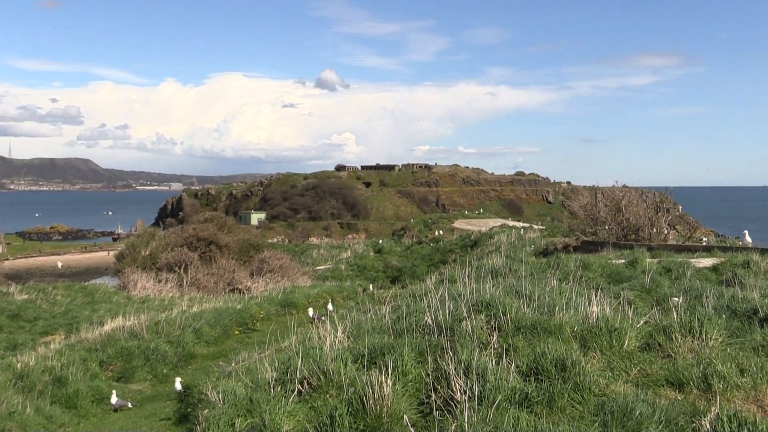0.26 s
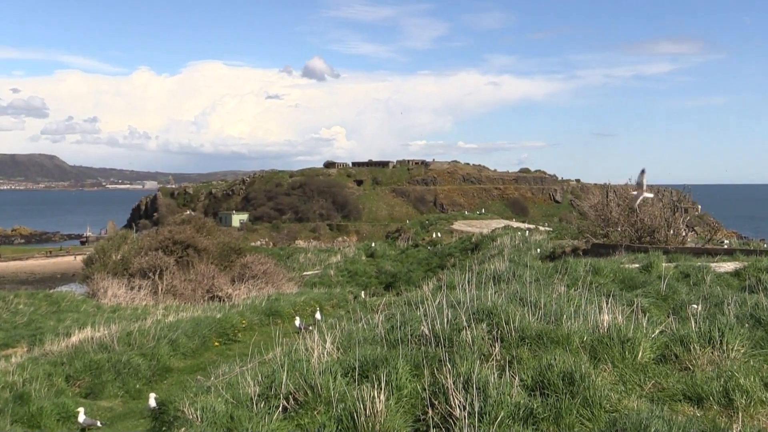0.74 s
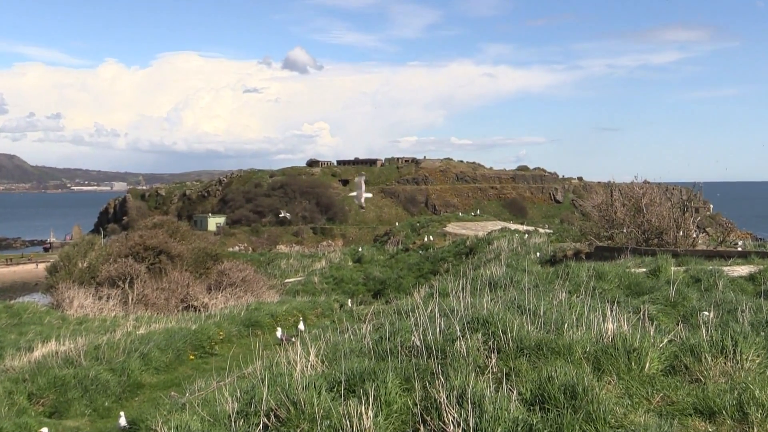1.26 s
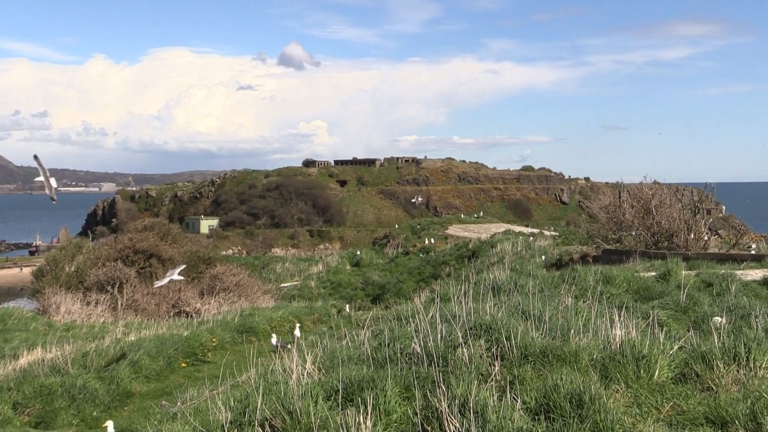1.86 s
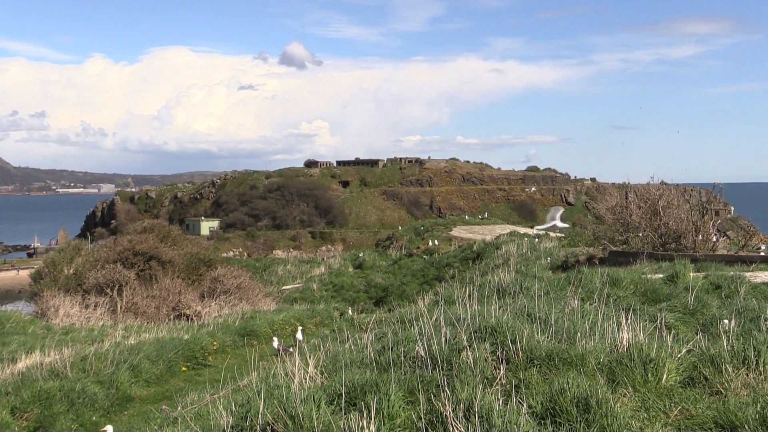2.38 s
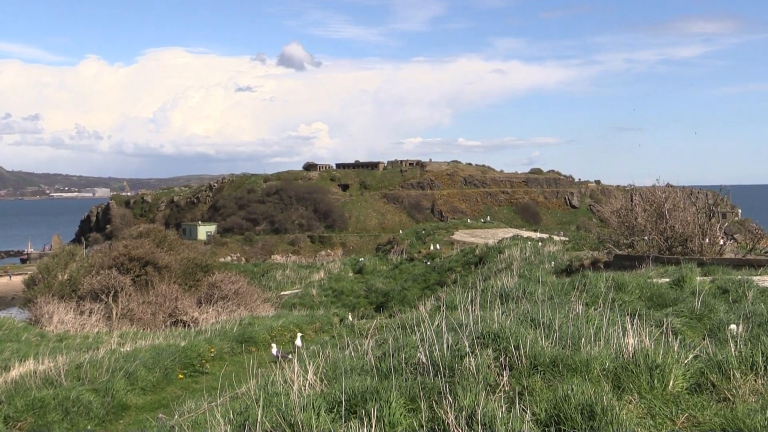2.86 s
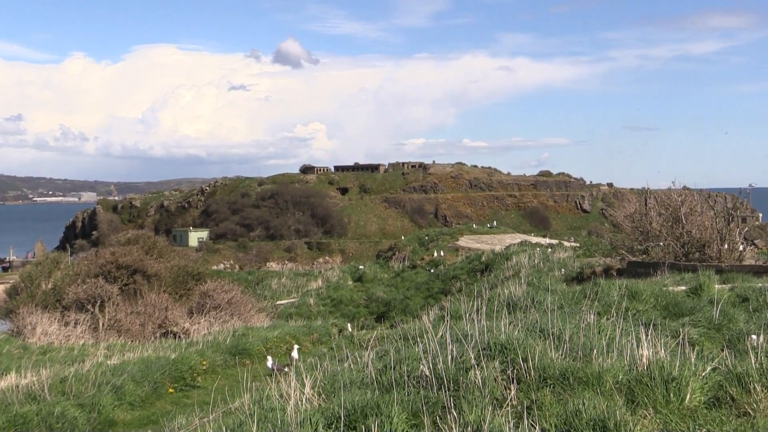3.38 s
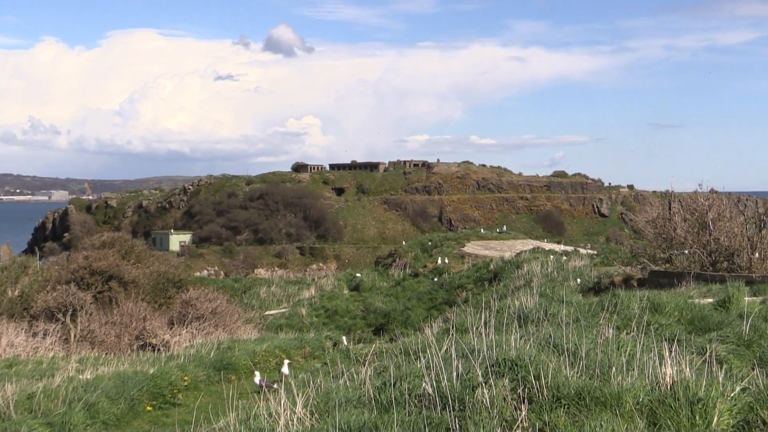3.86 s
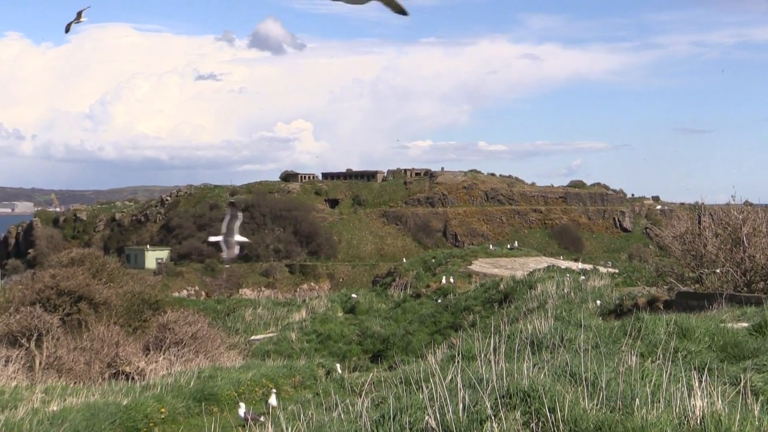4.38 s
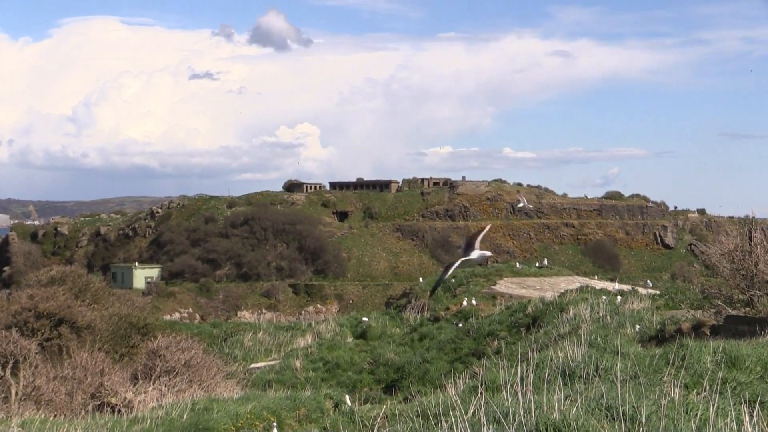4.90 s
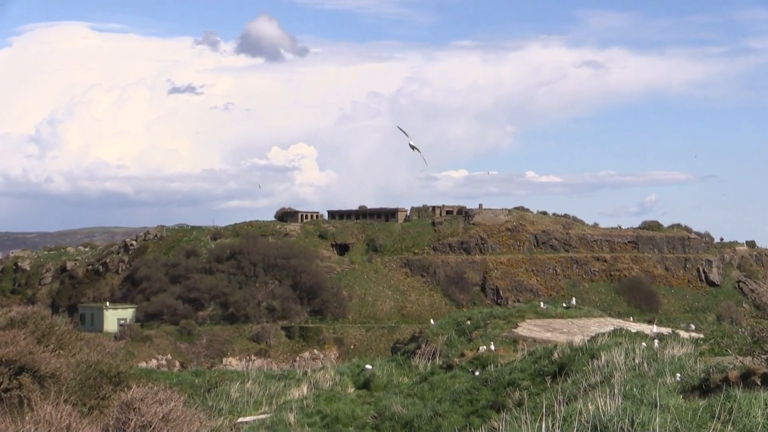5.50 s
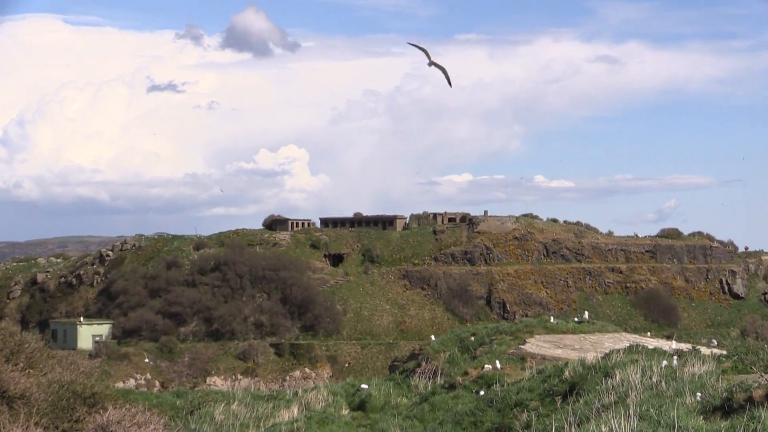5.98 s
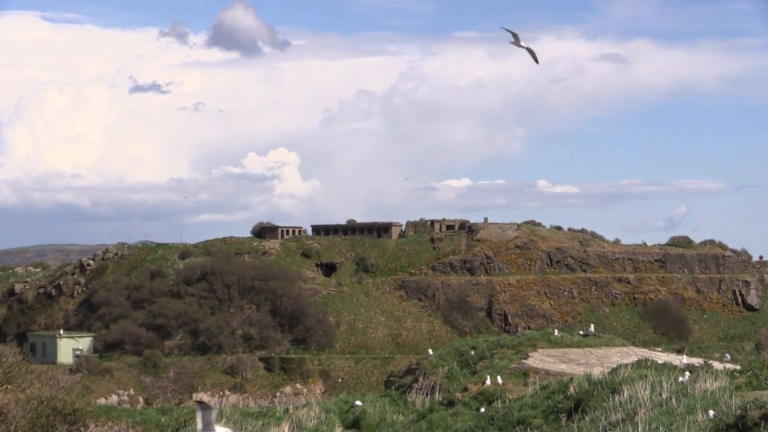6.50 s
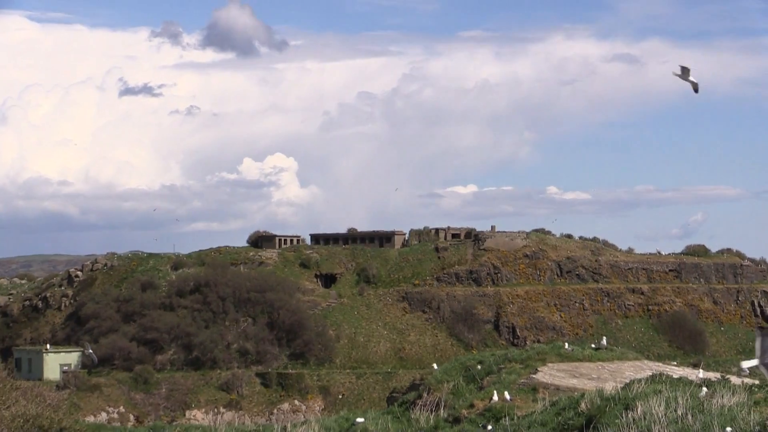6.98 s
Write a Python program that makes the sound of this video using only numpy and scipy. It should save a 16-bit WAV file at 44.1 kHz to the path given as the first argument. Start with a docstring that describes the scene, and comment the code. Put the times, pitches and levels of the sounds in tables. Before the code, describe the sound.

Outdoors on a grassy seaside slope, strong low gusts buffet the microphone over a faint mew. Within a second gulls start up close by: rapid high falling yelps, hoarse laughs breaking upward and soft mews, overlapping densely. Dull mews from far birds fill in behind with thin scattered echoes. Wind keeps rumbling in bursts and eases near the end, over a faint steady sea wash.

```python
"""A gust buffets the microphone over a faint mew, then a gull colony calls on a grassy island slope.
Close to the microphone, gulls trade high falling yelps, hoarse laughs that break upward and soft mews.
Each call is a stack of harmonics shaped by a throat spectrum; roughness makes it uneven and hissing.
Far birds are dull mews across the slope, and the slope's echoes are decaying sparse noise.
Behind them, shaped noise makes the sea wash and the wind rumble, which follows the gusts."""
import sys
import numpy as np
from scipy import signal
from scipy.fft import rfft, irfft
from scipy.io import wavfile
from scipy.ndimage import uniform_filter1d, map_coordinates

SR = 44100
rng = np.random.default_rng(int(sys.argv[2]) if len(sys.argv) > 2 else 0)


def to_wav(sig):
    """Store sig (one row per channel, or 1-D mono) as 16-bit WAV at the path in sys.argv[1].

    Samples outside -1..1 are clipped; the rate is SR.
    """
    pcm = np.clip(np.atleast_2d(sig), -1, 1) * 32767
    pcm = np.round(pcm).astype(np.int16)
    wavfile.write(sys.argv[1], SR, pcm.T)  # frames by channels


N = 319725  # samples


def undb(db):
    """Decibels to gain."""
    return 10 ** (np.asarray(db) / 20)


def unit(x):
    """Scale to rms 1."""
    return x / np.sqrt(np.mean(x ** 2) + 1e-18)


def filtered(x, order, hz, kind="low"):
    """Butterworth filter run forward in time."""
    return signal.sosfilt(signal.butter(order, hz, kind, fs=SR, output="sos"), x)


def colour(hz, points):
    """Gain of a (frequency [Hz], level [dB]) spectrum at the given frequencies."""
    point_hz, point_db = np.transpose(points)
    return undb(np.interp(np.log(hz + 1), np.log(point_hz), point_db))


def noise(points):
    """Noise with a given spectrum, at rms 1."""
    bins_hz = np.arange(N // 2 + 1) * SR / N
    spectrum = rfft(rng.standard_normal(N)) * colour(bins_hz, points)
    return unit(irfft(spectrum, N))


def wobble(size, hz):
    """Smooth random motion of spread about 1, mostly slower than hz."""
    knots = np.arange(size) * hz * 2 / SR
    values = rng.standard_normal(int(knots[-1]) + 4)
    return map_coordinates(values, [knots + 1], order=3, mode="nearest")


def add(track, start, sound):
    """Mix a sound in at its time in seconds."""
    i = int(start * SR)
    a, b = max(i, 0), min(i + len(sound), N)
    if b > a:
        track[a:b] += sound[a - i:b - i]


def drift(when, notes, first, last):
    """A quality that moves evenly from a voice's first note to its last."""
    return np.interp(when, [notes[0][0], notes[-1][0]], [first, last])


def arch(length, first, middle, last):
    """A pitch arch through three points, and the note's progress from 0 to 1."""
    progress = np.linspace(0, 1, int(length * SR))
    curve = np.polyfit([0, .5, 1], [first, middle, last], 2)
    return np.polyval(curve, progress), progress


def swell(progress, attack, release):
    """Smooth onset and end, as shares of the note."""
    onset = np.sin(np.pi / 2 * np.clip(progress / attack, 0, 1))
    end = np.sin(np.pi / 2 * np.clip((1 - progress) / release, 0, 1))
    return onset * end


def resonance(x, hz, width_hz):
    """One resonance, gain 1 at its centre."""
    return signal.lfilter(*signal.iirpeak(hz, hz / width_hz, SR), x)


def syrinx(hz, rough, throat, bright_db=0, jitter=0.06, doubling=0.85, hiss_db=-24):
    """Harmonics through the throat; driven hard, cycles go uneven, the period doubles and the tone rasps."""
    n = len(hz)
    waver, rasp, rattle = .007, .7, 1.1
    uneven_hz = hz * (1 + waver * wobble(n, 68.53) + jitter * rough * wobble(n, 295.9))
    phase = 2 * np.pi * np.cumsum(uneven_hz) / SR
    voice = np.zeros(n)
    # half-numbered partials belong to the doubled period
    for k in np.arange(2, int(2 * throat[-1][0] / hz.mean()) + 1) / 2:
        size = 1 if k % 1 == 0 else doubling * rough * (1 + wobble(n, 60))
        angle = k * phase + rng.uniform(-1.14, 1) * np.pi / 2  # the throat delays each partial differently
        partial = size * np.sin(angle) + rasp * rough * wobble(n, 216.9) * np.cos(angle)
        # effort lifts the treble; each overtone swells and fades as the beak and head move
        treble = np.interp(k * hz, [1300, 3400, 5200], [0, 1, .3])
        overtone_db = (bright_db + 3.2 * wobble(n, 14)) * treble
        voice += partial * colour(k * hz, throat) * undb(overtone_db)
    hiss = filtered(rng.standard_normal(n), 2, [4620, 6840], "band")
    breathy = unit(voice) + undb(hiss_db) * rough * unit(hiss)
    # the membranes slap unevenly, chopping all harmonics at once
    slap = 1 + rattle * rough * np.tanh(wobble(n, 480))
    return unit(breathy * slap)


# Near yelps, by voice: (middle of note [s], level before its swell [dB])
YELP_RUNS = { "opening": [(.36, -32), (.505, -27.5), (.921, -23.5), (1.149, -26)], "steep": [(1.055, -16),
             (1.274, -17), (1.492, -17)], "flat": [(1.367, -20.5), (1.588, -21.5), (1.805, -21),
             (2.035, -21), (2.264, -19), (2.5, -19.5)], "high": [(2.479, -23), (4.935, -19.5),
             (5.195, -16.5), (5.448, -17)], "clear": [(2.732, -17), (2.991, -17), (3.247, -18),
             (3.508, -17), (3.772, -16.5), (4.02, -18), (4.292, -18), (4.552, -19), (4.802, -19),
             (5.052, -19.5), (5.304, -18.5), (5.565, -18.5), (5.816, -18.5)], "harsh": [(4.199, -17.5),
             (4.462, -19.5), (4.727, -19.5), (4.985, -19), (5.238, -18.5), (5.495, -17.5)],
             "long": [(5.74, -19), (6.046, -20), (6.331, -19), (6.606, -21), (6.89, -23), (7.1, -27.5)],
             "fading": [(6.668, -26), (7.188, -25.5)]}
# How each yelping voice drifts from its first note to its last, before the shaping inside each note:
# (first pitch [Hz], last pitch [Hz], fall within a note [0-1], first length [s], last length [s],
#  first roughness [0-1], last roughness [0-1], first overtone lift [dB], last overtone lift [dB])
YELPERS = { "opening": (1222, 1205, 0.065, .085, .082, 0.071, 0.16, 13.5, 3.1),
           "steep": (1380, 1290, 0.24, .046, .05, 0.32, .14, 9.6, 1.2),
           "flat": (1108, 1088, 0.036, .06, .066, .14, 0.44, 4.2, 6),
           "high": (1410.5, 1340.5, .095, 0.28, 0.1149, 0.33, .28, -6, 2),
           "clear": (1290.5, 1329.5, .134, 0.1234, 0.0629, 0.38, 0.16, -3, -3.5),
           "harsh": (1335, 1255, .14, .092, .062, 0.33, .58, 6, 10.4),
           "long": (1324.5, 1309.5, .128, 0.13, 0.19, 0.48, 0.74, -7.5, 7.5),
           "fading": (1279, 1335, .15, 0.02, .094, .2, .25, -14, -17)}
# the last voice in both tables goes by "dull": soft yelps with weak overtones
YELP_RUNS["dull"] = YELP_RUNS.popitem()[1]
YELPERS["dull"] = YELPERS.popitem()[1]


def yelping_gulls(lead_top_hz=3000, lead_s=.08, lead_db=-8, lead_ceiling_db=-27):
    """Runs of near yelps that drift in pitch, length and tone, each led in by a soft rising note an octave below."""
    out = np.zeros(N)
    for name, notes in YELP_RUNS.items():
        hz0, hz1, fall, length0, length1, rough0, rough1, bright0, bright1 = YELPERS[name]
        for when, db in notes:
            hz = drift(when, notes, hz0, hz1)
            length = drift(when, notes, length0, length1)
            rough = drift(when, notes, rough0, rough1)
            bright_db = drift(when, notes, bright0, bright1)
            start, last = when - length / 2, hz * (1 - fall)
            add(out, start, undb(db) * yelp(length, hz, last, rough, bright_db))
            lead = mew(lead_s, 0.36 * last, .47 * last, .51 * last, beak_hz=1515, beak_width_hz=590,
                       beak_db=11.5, overtone_db=-9.5)
            lead = filtered(lead, 2, lead_top_hz)  # the beak is still half shut
            add(out, start - .62 * lead_s, undb(min(db + lead_db, lead_ceiling_db)) * lead)
    return out


# Throat colour of the high register: (frequency [Hz], level [dB])
HIGH_THROAT = [(550, -18), (1050, 0), (1300, -0.5), (1800, -5), (2450, -8), (3450, -6.5), (4100, -21.5),
               (4800, -20.5), (6200, -43), (10000, -63.5)]


def yelp(length, first, last, rough, bright_db, bow=0.02957, opening_db=7):
    """A high note sagging at both ends, brightest as the beak gapes, clearing as the pressure drops."""
    hz, progress = arch(length, first, (1 + bow) * (first + last) / 2, last)
    hz = hz * (1 - .035 * (2 * progress - 1) ** 6)
    gape_db = bright_db + opening_db * (np.sin(np.pi * progress) - .75)
    clearing = np.clip(rough, 0, 1) * (1.25 - .7 * progress)
    return syrinx(hz, clearing, HIGH_THROAT, gape_db) * swell(progress, .28, .28)


# Near laughs, by voice: (crest time [s], level before its contour and swell [dB])
LAUGH_RUNS = { "low": [(1.019, -26), (1.245, -23), (1.48, -25), (1.7, -22.5), (1.919, -19), (2.141, -20.5),
              (2.365, -20.5), (2.604, -18.5), (2.83, -20.5), (3.055, -24), (3.282, -22), (3.521, -21),
              (3.765, -21.5), (3.985, -18.5), (4.251, -21.5), (4.5, -23), (4.755, -29), (5.001, -30)],
              "strained": [(4.399, -18.5), (4.648, -19.5), (4.895, -20.5), (5.149, -19), (5.416, -20.5),
              (5.74, -20.5), (6.025, -22), (6.316, -20.5), (6.595, -20), (6.876, -24.5), (7.121, -22.5)],
              "middle": [(5.319, -23.5), (5.605, -21.5), (6.682, -25.5)], "clean": [(5.868, -23),
              (6.14, -23), (6.403, -24), (6.534, -26), (6.808, -25), (7.23, -27)]}
# Each laughing voice; a negative climb leaves only a scrap of the note after its crest time:
# (first nominal crest pitch [Hz], last nominal crest pitch [Hz], climb [s], level at climb start [dB],
#  hoarseness [factor], beak resonance [Hz], beak level [dB])
LAUGHERS = { "low": (523, 507, .092, -6, 1, 2700, -4), "strained": (612, 594, 0.1264, -6, 1.98, 3499, -8),
            "middle": (585, 562, -0.04, -6.5, 1.6, 3301.5, -12.5),
            "clean": (506, 514, 0.35, -13, 0.65, 3061, -4)}


def laughing_gulls():
    """Runs of near laughing notes; each voice repeats one shape while its pitch drifts."""
    out = np.zeros(N)
    for name, notes in LAUGH_RUNS.items():
        hz0, hz1, climb, climb_db, hoarse, beak_hz, beak_db = LAUGHERS[name]
        for crest, db in notes:
            crest_hz = drift(crest, notes, hz0, hz1)
            note = laugh(climb, crest_hz, climb_db, hoarse, beak_hz, beak_db)
            add(out, crest - climb, undb(db) * note)
    return out


# Throat colour of the low register, also used by the mews: (frequency [Hz], level [dB])
LOW_THROAT = [(480, -24.5), (950, -8), (1450, -2.5), (2150, -4.5), (2750, -5.5), (3200, -2), (3600, -2),
              (4150, -9), (4900, -21), (7500, -43.5)]


def laugh(climb, crest_hz, climb_db, hoarse, beak_hz, beak_db, fall=0.0445, knee=.017, dull_db=-14,
          beak_width_hz=260):
    """A clean climbing note that brightens, breaks upward to a loud, hoarse crest and sags."""
    t = np.arange(-climb, fall, 1 / SR)  # seconds from the crest
    pitch_times = [-climb, -(knee + climb) / 2, -knee, -knee / 2, 0, fall / 2, fall]
    hz = crest_hz * np.interp(t, pitch_times, [.73, .86, .895, 1.0, .995, .98, .82])
    rough = hoarse * np.interp(t, [-1.3 * knee, -knee / 2, 0, fall], [.04, .32, .13, .25])
    bright_db = np.interp(t, [-climb, -knee, fall / 2, fall], [dull_db, 0, 0, dull_db / 2])
    voice = syrinx(uniform_filter1d(hz, size=300), rough, LOW_THROAT, bright_db)
    voice = unit(voice + undb(beak_db) * unit(resonance(voice, beak_hz, beak_width_hz)))
    contour_db = np.interp(t, [-climb, -knee, 0, fall], [climb_db, climb_db / 2, 0, -5])
    return voice * undb(contour_db) * swell((t + climb) / (climb + fall), .25, .17)


# Near drawn-out mews: (start [s], length [s], first pitch [Hz], middle pitch [Hz], last pitch [Hz],
#  level before its swell [dB], beak resonance [Hz], second resonance relative to the note [dB])
SINGLE_MEWS = [(-.03, .19, 490, 500.6, 516, -41.5, 1040, -6.5), (0.141, .24, 708, 727, 709, -39, 1350, -12),
               (0.171, 0.13, 558, 623, 706, -36, 1990, -38), (.592, 0.19, 437, 472, 527, -37.5, 900, -9),
               (0.681, .1, 605, 683, 712, -31.5, 2010, -42), (0.767, 0.13, 614, 686, 698, -26.5, 1980, -43),
               (3.529, .1, 537, 532, 462, -26.5, 1054, -15), (3.632, .11, 468, 527, 513, -30.5, 1344, -15),
               (4.04, .16, 648, 655, 611, -31, 1850, -30)]


def mewing_gulls(upper_ratio=3.27, upper_width_hz=380):
    """Single near mews; in some the beak's second resonance whistles."""
    out = np.zeros(N)
    for start, length, first, middle, last, db, beak_hz, upper_db in SINGLE_MEWS:
        note = mew(length, first, middle, last, beak_hz, beak_db=7, overtone_db=-6)
        upper_hz = upper_ratio * beak_hz
        whistle = resonance(note, upper_hz, upper_width_hz)
        whistle = unit(resonance(whistle, upper_hz, upper_width_hz))
        add(out, start, undb(db) * (note + undb(upper_db) * whistle))
    return out


def mew(length, first, middle, last, beak_hz, beak_width_hz=200, beak_db=6, overtone_db=-5):
    """A soft, clean low note whose harmonics are reinforced by one beak resonance."""
    hz, progress = arch(length, first, middle, last)
    voice = syrinx(hz, .05, LOW_THROAT, bright_db=overtone_db)
    beak = unit(resonance(voice, beak_hz, beak_width_hz))
    return unit(voice + undb(beak_db) * beak) * swell(progress, .18, .15)


def far_gulls(count=80, far_db=-36, calm_db=-13, air_hz=2400):
    """Mews across the slope, spread over the whole scene and growing over the first 4 s; distance dulls them."""
    out = np.zeros(N)
    for i, (when, size, pitch, bend, distance) in enumerate(rng.random((count, 5))):
        start = (i + when) / count * N / SR
        hz = 400 + 280 * pitch
        note = mew(.1 + 0.12 * size, hz * (.8 + .2 * bend), hz, .88 * hz, beak_hz=900 + 700 * bend)
        joining_db = np.interp(start, [.4, 4], [calm_db, 0])
        add(out, start, note * undb(far_db - 2 * distance + joining_db))
    return filtered(out, 1, air_hz)


def slope(x, t60=0.72, top_hz=3000):
    """Open ground returns a thin, dull scatter of echoes."""
    t = np.arange(SR) / SR
    # cubing makes a few echoes stand out; none returns within 6 ms
    echoes = rng.standard_normal(SR) ** 3 * undb(-60 * t / t60) * (t > .006)
    echoes = filtered(echoes, 2, top_hz)
    return signal.fftconvolve(x, echoes / np.linalg.norm(echoes))[:N]


# Spectrum of the rumble at the microphone: (frequency [Hz], level [dB])
WIND_SPECTRUM = [(12, -35.5), (20, -5), (54, 1.5), (81, 1.5), (137, -9), (260, -21.5), (379, -34),
                 (650, -44), (840, -72), (1430, -120)]


def wind(eddy_db=2.5, flutter_db=4.0, eddy_hz=130):
    """Gusts set the rumble's level; eddies buffet it and make its upper part flutter."""
    rumble = noise(WIND_SPECTRUM)
    rumble = rumble / np.sqrt(uniform_filter1d(rumble ** 2, size=4000))  # even out its own swells
    upper = signal.sosfiltfilt(signal.butter(2, eddy_hz, "high", fs=SR, output="sos"), rumble)
    buffet = rumble + upper * (undb(flutter_db * wobble(N, 22)) - 1)
    return buffet * gust_strength() * undb(eddy_db * wobble(N, 14))


# Gusts on the microphone: (arrival at full strength [s], hold [s], level before eddies [dB])
GUST_TIMES = [(0.102, 0.087, -10.5), (0.342, .14, -7.5), (0.597, 0.11, -15), (1.995, 0.13, -9),
              (2.202, 0.18, -17), (2.623, 0.06, -10), (2.777, 0.092, -15.5), (3.057, 0.82, -12.5),
              (4.0, 0.25, -13.5), (4.497, 0.42, -14.5), (5.037, 0.24, -15), (5.74, 0.48, -25.5),
              (6.24, 0.054, -16.5), (6.637, 0.028, -19), (6.847, 0.087, -20), (7.015, .23, -28.5)]


def gust_strength(attack_s=0.072, decay_s=0.076, lull_db=-33):
    """Each gust builds quickly, holds and dies away into a light breeze."""
    t = np.arange(N) / SR
    strength = np.full(N, undb(lull_db))
    for arrival, hold, db in GUST_TIMES:
        build = np.clip(1 + (t - arrival) / attack_s, 0, 1)
        die = np.exp(-np.clip(t - arrival - hold, 0, 1) / decay_s)
        strength = np.maximum(strength, undb(db) * build * die)
    return strength


# Spectrum of the sea below the slope: (frequency [Hz], level [dB])
SEA_SPECTRUM = [(30, -14.5), (100, -3.5), (380, 1), (700, -7.5), (2000, -12), (4000, -36), (6500, -38.5),
                (15000, -42.5)]


def sea_wash(sea_db=-39):
    """Broad noise from below the slope, its level wandering slowly."""
    return noise(SEA_SPECTRUM) * undb(sea_db + 0.55 * wobble(N, 1.3))


def scene(echo_db=-17):
    """Near and far gulls, their echoes, wind and sea wash."""
    near = yelping_gulls() + laughing_gulls() + mewing_gulls()
    far = far_gulls()
    echoes = slope(undb(echo_db) * near + far / 2)
    return (near + far + echoes + wind() + sea_wash())[None]


def record(dry, ceiling=.92, top_hz=15700):
    """The recorder rounds the highest peaks and cuts the top."""
    rounded = dry / (1 + (dry / ceiling) ** 8) ** (1 / 8)
    return signal.sosfilt(signal.ellip(8, .2, 70, top_hz, fs=SR, output="sos"), rounded)


dry = scene()
out = record(dry)
to_wav(out)
```